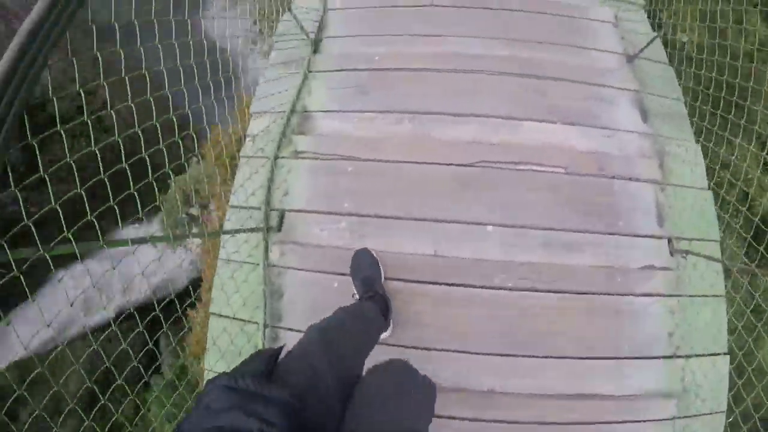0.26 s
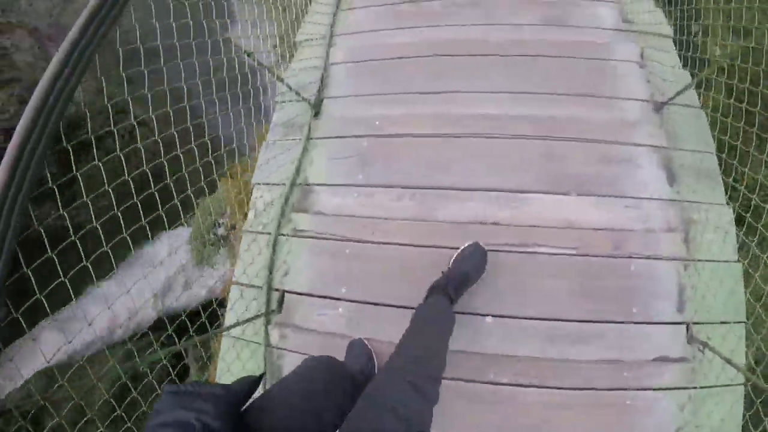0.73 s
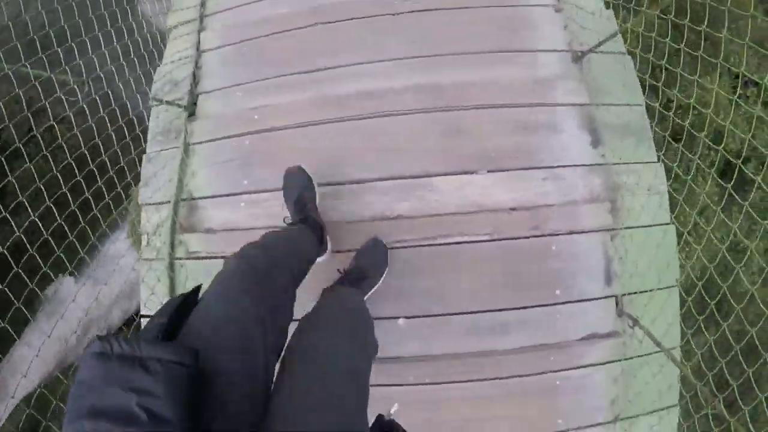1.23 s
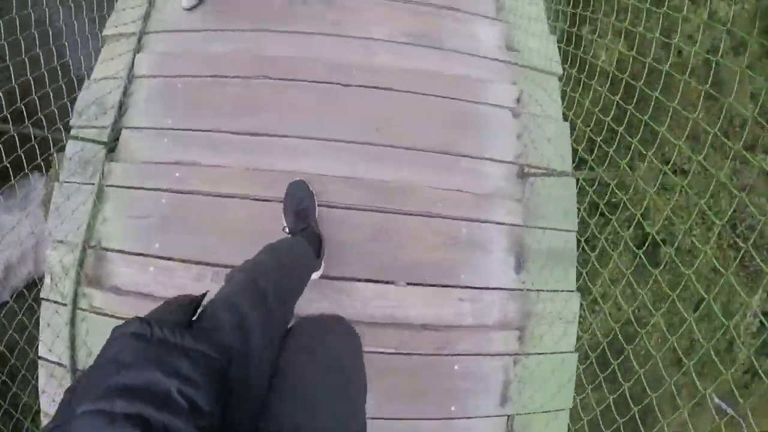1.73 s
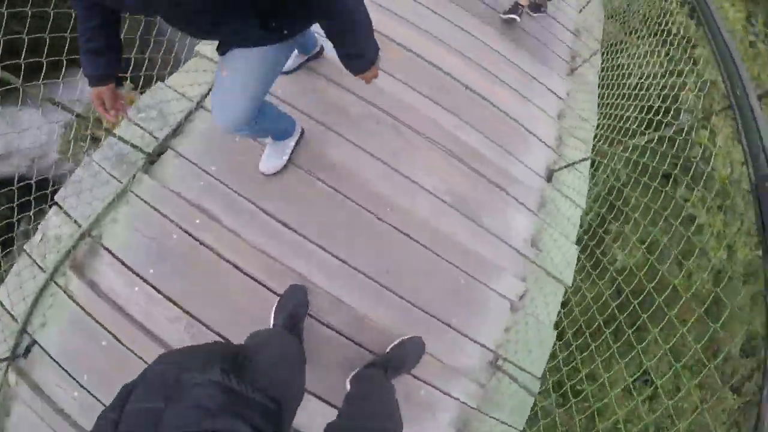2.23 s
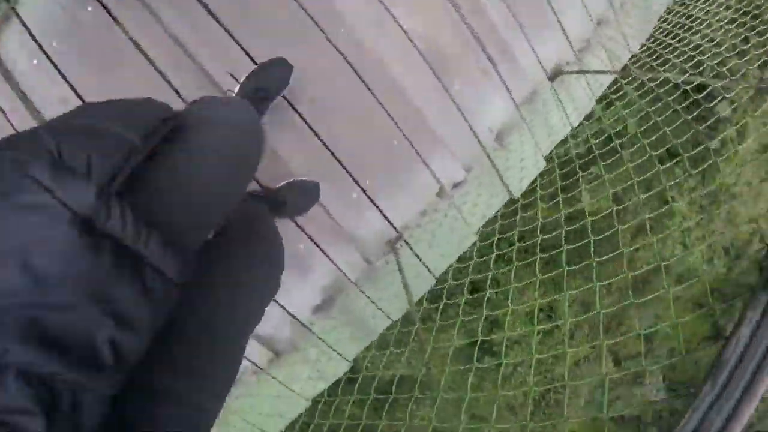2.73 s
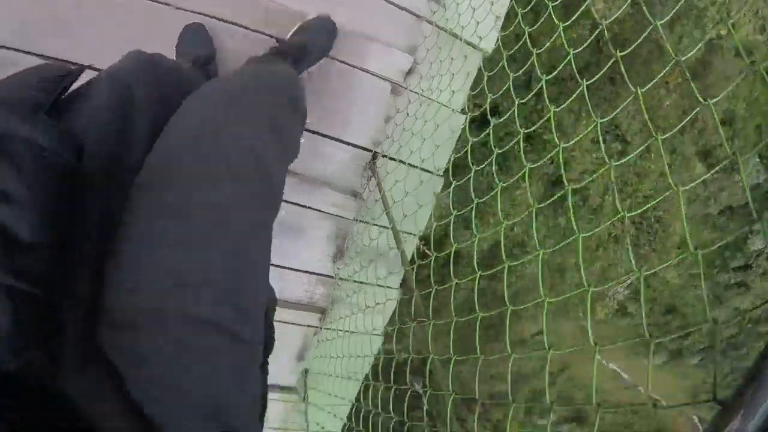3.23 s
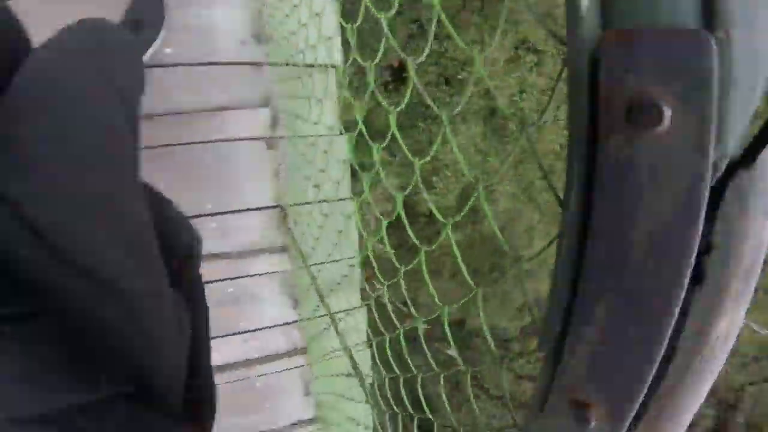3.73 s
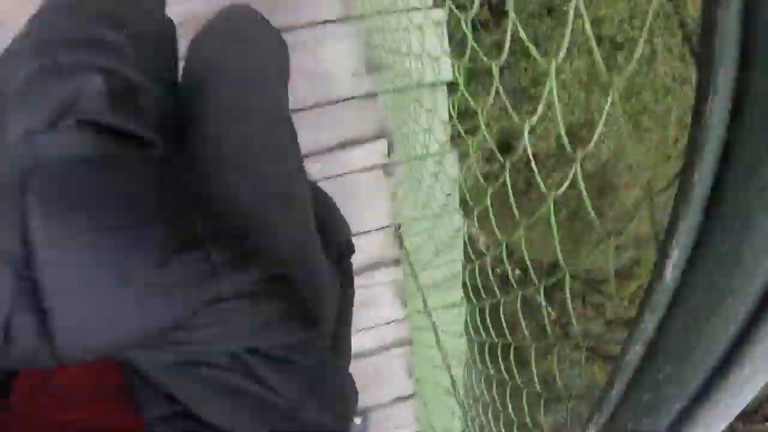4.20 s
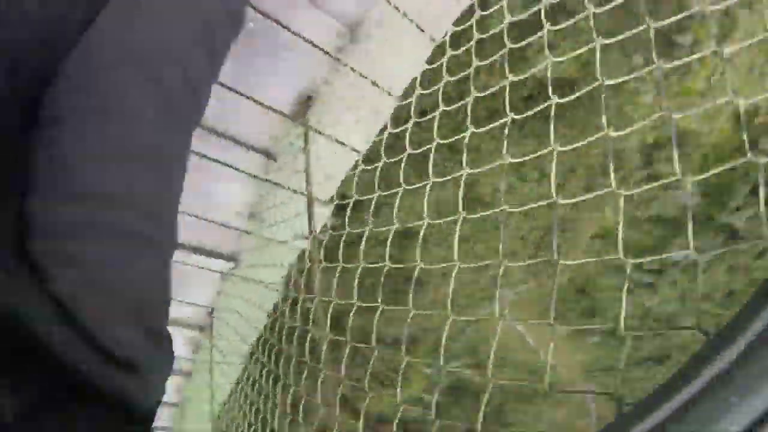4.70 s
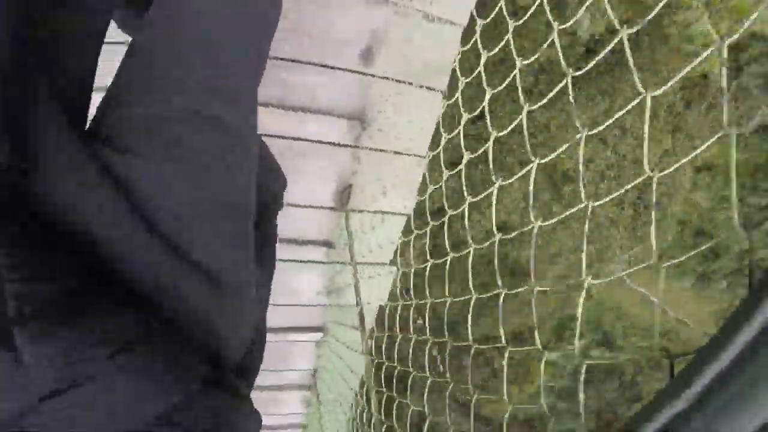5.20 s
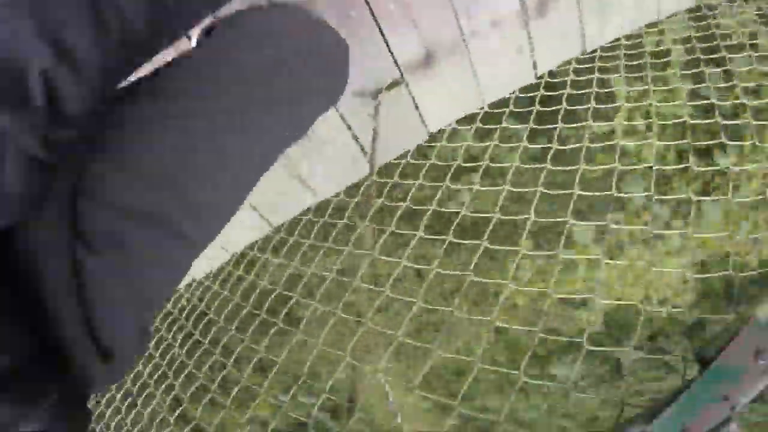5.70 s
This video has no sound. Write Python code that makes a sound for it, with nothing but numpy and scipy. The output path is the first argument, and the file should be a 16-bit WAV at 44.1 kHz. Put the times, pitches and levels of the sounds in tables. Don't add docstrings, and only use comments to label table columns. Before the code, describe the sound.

Muffled rushing water hisses steadily below a plank bridge while heavy low thumps, plastic knocks and jacket scuffs strike a chest-worn, enclosed camera microphone.

```python
import sys
import numpy as np
from scipy import signal
from scipy.io import wavfile
from scipy.ndimage import uniform_filter1d

SR = 44100
rng = np.random.default_rng(int(sys.argv[2]) if len(sys.argv) > 2 else 0)


def invert_db(level):
    return 10 ** (np.asarray(level, dtype=float) / 20)


def put_to_file(sound):
    columns = np.atleast_2d(sound).T
    safe = np.clip(columns, -1, 1)
    whole_steps = np.round(safe * 32767)
    wavfile.write(sys.argv[1], SR, whole_steps.astype(np.int16))


N = 262395


def evened(x):
    return x / np.sqrt(np.mean(x ** 2) + 1e-20)


def add(mix, s, sound):
    part = mix[round(s * SR):][:len(sound)]
    part += sound[:len(part)]


def along(rows):
    s, *columns = np.transpose(rows)
    return [np.interp(np.arange(N) / SR, s, c) for c in columns]


def bandpass(x, order, lo_hz, hi_hz):
    sos = signal.butter(order, [lo_hz, hi_hz], "band", fs=SR, output="sos")
    return signal.sosfilt(sos, x)


def band(x, lo_hz, hi_hz):
    return evened(bandpass(x, 2, lo_hz, hi_hz))


# time in seconds, level in dB.
TORRENT_LEVEL = [(0.0, -48), (2.0, -51), (3.0, -49.5), (4.6, -50), (5.95, -49)]
# frequency in Hz, density in dB per Hz.
WATER_COLOUR = [(53, -57), (90, -11), (145, 8), (315, -19), (380, -6), (859, -6.5), (1220, -9), (2060, -7),
                (2240, -10), (3630, -7.5), (5170, -13.5), (6110, -8.5), (7230, -18), (13200, -30)]
# frequency in Hz, width in Hz, lift in dB.
HOUSING_MODES = [(1247, 212, 7.5), (2268, 167, 10.5), (3150, 600, 2), (3767, 65, 8.5), (6075, 360, 6.5)]


def torrent():
    frames, hz = N // 256 + 5, np.fft.rfftfreq(1024, 1 / SR)
    real, imaginary, patches = rng.standard_normal((frames, 513, 3)).T
    patches = uniform_filter1d(patches, 10, 0)
    patches = evened(uniform_filter1d(patches, 10, 1))

    colour_hz, density_db = np.transpose(WATER_COLOUR)
    colour_db = np.interp(np.log(hz + 1), np.log(colour_hz), density_db)
    for mode_hz, width_hz, lift_db in HOUSING_MODES:
        colour_db += lift_db / (1 + (2 * (hz - mode_hz) / width_hz) ** 2)
    colour_db -= 6.3 / (1 + np.exp((3900 - hz) / 40))

    spectra = (real + 1j * imaginary) * invert_db(colour_db[:, None] + 1.2 * patches)
    hiss = signal.istft(spectra, nperseg=1024, noverlap=768)[1][:N]
    scale = np.std(bandpass(hiss, 4, 1000, 6800))
    return hiss / scale * invert_db(along(TORRENT_LEVEL)[0] + ducking())


# time in seconds, effort in dB over standing still.
EFFORT = [(0.0, 2), (1.5, 0.5), (1.75, 5), (2.0, 1), (2.3, 13.5), (2.4, 0), (2.5, 7), (2.9, 12), (3.1, 4),
          (3.6, 1), (3.9, 13), (4.1, 5), (4.4, 8.5), (4.85, 11.5), (5.05, -3.5), (5.62, 17.5), (5.76, -2),
          (5.95, 14)]


def shaking():
    effort_db = along(EFFORT)[0]
    sway_db = -40 + 0.46 * effort_db
    deck_db = -50.5 + 1.3 * effort_db
    rustle_db = -54.5 + 0.33 * effort_db

    a, b, c, lumps = rng.standard_normal((N, 4)).T
    lumps = evened(uniform_filter1d(uniform_filter1d(lumps, 700), 700))
    sway = invert_db(sway_db + 0.5 * lumps) * band(a, 7.8, 29.0)
    deck = invert_db(deck_db + 2.5 * lumps) * band(b, 51.3, 79.6)
    rustle = invert_db(rustle_db + 0.25 * ducking() + 2.1 * lumps) * band(c, 68, 334)
    return sway + deck + rustle


# time in seconds, pitch in Hz, level in dB.
WHISTLES = [
    [(1.33, 1118, -72), (1.38, 1170, -57), (1.45, 1276, -53), (1.52, 1330, -69)],
    [(5.06, 3450, -78), (5.09, 3510, -55), (5.12, 3530, -58), (5.145, 3750, -75)],
]


def whistles():
    out = np.zeros(N)
    for rows in WHISTLES:
        s, hz, db = np.transpose(rows)
        t = np.arange(s[0], s[-1], 1 / SR)
        phase = 2 * np.pi * np.cumsum(np.interp(t, s, hz)) / SR
        add(out, s[0], invert_db(np.interp(t, s, db)) * np.sin(phase))
    return out


# start in seconds, peak in dB, first swing in Hz, last swing in Hz, decay t60 in seconds.
PUSHES = [(2.122, -17.5, 60, 65, 0.2), (2.205, -20.5, 65, 68, 0.22), (2.479, -17.5, 55, 61, 0.41),
          (2.515, -7.5, 45, 51, 0.11), (2.846, -21.5, 60, 55, 0.19), (3.356, -13, 25, 13.6, .15),
          (3.378, -13.5, 85, 50, 0.14), (4.239, -6, 35, 19.2, 0.3), (4.578, -10, 60, 41, 0.081),
          (4.938, 7.5, 46, 42.2, 0.1), (5.245, -21.5, 48, 47, 0.13), (5.46, -7, 40, 27.5, 0.15),
          (5.509, -7.5, 65, 35.6, 0.35), (5.56, -31, 60, 53, 0.11), (5.6, -24, 30, 13, 0.13),
          (5.647, -1, 48, 24.5, 0.23), (5.879, -26.5, 52, 47, 0.57)]
PULLS = [(1.698, -31, 45, 30, 0.73), (2.344, 5, 128, 22.2, 0.16), (2.767, -5, 43, 24.2, 0.34),
         (3.109, -15, 22.2, 21.3, 0.28), (3.798, -10, 74, 40, 0.06), (3.992, -4.5, 65, 43.8, .15),
         (4.214, -10, 48, 42.2, 0.09), (4.297, -17, 52, 40, .082), (4.947, -4, 40, 23.3, 0.13),
         (5.657, 2, 70, 15, .15)]
HEAVES = [
    (2.391, -37, 30, 24, 0.096),
    (4.363, 7.5, 52, 28.3, .17),
]


def jolts():
    out, t = np.zeros(N), np.arange(SR // 2) / SR
    sharp, slow = 0.177, 0.56
    for direction, turns, rows in ((1, sharp, PUSHES), (-0.91, sharp, PULLS), (-0.91, slow, HEAVES)):
        for s, db, first_hz, last_hz, t60 in rows:
            hz = last_hz + (first_hz - last_hz) * np.exp(-t / 0.0047)
            rise = (1 - np.exp(-t * first_hz / turns)) ** 2
            swing = np.sin(2 * np.pi * np.cumsum(hz) / SR)
            add(out, s, direction * invert_db(db - 60 * t / t60) * rise * swing)
    return out


def resonate(x, hz, width):
    r = np.exp(-np.pi * width / SR)
    return signal.lfilter([1 - r, 0, r - 1], [1, -2 * r * np.cos(2 * np.pi * hz / SR), r * r], x)


def ring(drive, part):
    modes, lo_hz, hi_hz = part
    out = sum(invert_db(db) * resonate(drive, hz, width) for hz, width, db in modes)
    out = bandpass(out, 3, lo_hz, hi_hz)
    return out / abs(out).max()


# start in seconds, peak in dB, decay t60 in seconds, chest plate in dB.
TUGS = [(2.111, -35.5, .14, -21), (2.206, -25, .1, -15), (2.749, -32, 0.037, -28), (3.38, -27, .033, -26),
        (3.799, -29.5, 0.16, -24), (3.987, -40, .1, 5), (4.214, -38.5, .1, 0.5), (4.292, -36, 0.13, -2.5),
        (4.817, -36, 0.084, -20), (4.933, -19.5, 0.061, 2.5), (5.511, -42, .1, 7), (5.876, -34, 0.045, -1)]
# start in seconds, peak in dB, decay t60 in seconds,
# slack in dB that reaches strap and plate.
KNOCKS = [(2.245, -33.5, .071, -7), (2.297, -35.5, 0.34, 0), (2.35, -19.5, 0.039, -28),
          (2.477, -35.5, .22, -5), (2.497, -31, 0.24, -14), (2.51, -26.5, 0.072, -10),
          (2.648, -44.5, 0.38, -15.5), (2.841, -36.5, 0.37, -9), (3.062, -42, 0.086, -9),
          (3.213, -37, .075, -18), (3.228, -37, 0.26, -12), (3.322, -43, 0.13, -14),
          (3.355, -31.5, 0.31, -13), (3.697, -37, .081, -11), (3.768, -30, 0.26, -1),
          (3.887, -38.5, .07, -7), (3.968, -32, 0.31, -3), (4.316, -32.5, 0.15, -1),
          (4.341, -24, .068, -31), (4.386, -27.5, 0.038, -6.5), (4.499, -30, 0.16, -9),
          (4.513, -49, .1, -14), (4.945, -25, 0.085, -2.5), (5.365, -33.5, 0.067, -16),
          (5.423, -37.5, .1, -7), (5.427, -35, 0.72, -25), (5.471, -36, .14, 2.5),
          (5.615, -25.5, 0.14, -4.5), (5.658, -26.5, 0.13, -5), (5.941, -31.5, 0.072, -21)]
# modes as frequency in Hz, width in Hz, level in dB; then lowest and highest Hz passed.
MOUNT = [(444, 26, 0), (385, 90, -7.5)], 220, 475


def knocks():
    strap = [(305, 123, 0)], 180, 420
    plate = [(172, 82, 0)], 141, 290
    plate_under_strap_db, mount_in_tug_db = -5, -8.5

    out, t = np.zeros(N), np.arange(SR // 5) / SR
    rows = [(s, db, t60, 0, slack, slack + plate_under_strap_db) for s, db, t60, slack in KNOCKS]
    rows += [(s, db, t60, mount_in_tug_db, 0, plate_db) for s, db, t60, plate_db in TUGS]
    for (s, db, t60, *parts_db), noise in zip(rows, rng.standard_normal((len(rows), len(t)))):
        drive = noise * invert_db(-60 * t / t60) + 35 * (t == 0)
        parts = zip(parts_db, (MOUNT, strap, plate))
        add(out, s, invert_db(db) * sum(invert_db(part_db) * ring(drive, part) for part_db, part in parts))
    return out


# start in seconds, peak in dB, decay t60 in seconds, bass in dB, crack in dB.
SCUFFS = [(2.2074, -25.5, 0.02, -2.5, -24), (2.245, -36.5, 0.04, -6, -21), (2.284, -40, .033, -7, -15),
          (2.2952, -35.5, 0.071, -2.5, -18), (2.3486, -17.5, 0.019, -5.5, -10),
          (2.4782, -43.5, 0.058, 5, -19), (2.4964, -39, 0.04, -5, -9), (2.5122, -29.5, 0.053, -4.5, -15),
          (2.9, -40, 0.29, -11, -13), (3.258, -39, .034, -6, -15), (3.7689, -40, .032, 2, -14),
          (3.7996, -30.5, 0.027, -2, -22), (3.9649, -43, 0.025, 4, -16), (4.3393, -41.5, 0.036, 6, -23),
          (4.5012, -37, 0.028, -1, -20), (4.8205, -35.5, .037, -6, -22), (4.827, -30, 0.017, -11, -22),
          (4.9345, -25, 0.043, 1, -21), (4.9399, -28.5, 0.033, -11, -21), (4.962, -37.5, 0.17, -9, -24),
          (5.3644, -46, 0.022, 5, -18), (5.5205, -49, .03, 13, -24), (5.6575, -32.5, .046, -3.5, -18),
          (5.7169, -38, .03, -6, -19)]
# start in seconds, peak in dB, decay t60 in seconds,
# treble in dB, crack in dB.
TICKS = [(2.3704, -47, .03, -13, -24), (2.5059, -34.5, 0.02, 0.5, -30), (2.749, -34, 0.055, -8, -22),
         (2.8413, -32.5, 0.042, -11, -16), (3.347, -16.5, 0.031, -5, -36), (3.3503, -17.5, 0.041, -31, -39),
         (3.3673, -25.5, .035, -4, -24), (3.3739, -26, .032, -2, -27), (3.3964, -34, 0.026, -17, -14),
         (3.9888, -43, .03, -9, -20), (4.3195, -27.5, 0.0094, -3, -15), (4.3725, -34, 0.034, -17, -22),
         (4.3866, -36, 0.04, -15, -21), (5.4242, -29, 0.053, -8, -19), (5.6114, -37, 0.035, -8, -25),
         (5.9414, -33, 0.021, -3, -18)]
# modes as frequency in Hz, width in Hz, level in dB; then lowest and highest Hz passed.
SHELL = [(1477, 270, -1), (1607, 47, -1), (2228, 440, 2)], 1200, 2470
SHELL_TREBLE = [(3410, 320, 1), (3686, 120, 5.5)], 2730, 3860
SHELL_BASS = [(798, 166, 2), (1210, 87, 8.5)], 690, 1218
SHELL_CRACK = [(4760, 440, 13), (5270, 620, -2), (6200, 880, -15), (8800, 2500, -15)], 4000, 10500


def scuffs():
    tick_bass_db, scuff_treble_db = -18.5, -8.5
    out, t = np.zeros(N), np.arange(SR // 8) / SR
    rows = [(s, db, t60, treble, tick_bass_db, crack) for s, db, t60, treble, crack in TICKS]
    rows += [(s, db, t60, scuff_treble_db, bass, crack) for s, db, t60, bass, crack in SCUFFS]
    noises = rng.standard_normal((len(rows), 2, len(t)))
    for (s, db, t60, *colour_db), (noise, grain) in zip(rows, noises):
        drive = noise * invert_db(3 * grain - 60 * t / t60) + 5 * (t == 0)
        parts = zip(colour_db, (SHELL_TREBLE, SHELL_BASS, SHELL_CRACK))
        walls = ring(drive, SHELL) + sum(invert_db(part_db) * ring(drive, part) for part_db, part in parts)
        rise_s = 0.0011 * invert_db(-30.5 - db)
        add(out, s, invert_db(db) * np.minimum(t / rise_s, 1) * walls)
    return out


# time in seconds, depth in dB.
DUCKS = [(2.352, 6.5), (2.52, 2.5), (3.36, 3.5), (3.62, 3.5), (3.8, 3), (4.0, 3.5), (4.25, 2), (4.945, 6)]


def ducking():
    hold_s, recover_db_per_s = 0.062, 10
    t = np.arange(N) / SR
    dips = [(t >= s) * (db - recover_db_per_s * np.maximum(t - s - hold_s, 0)) for s, db in DUCKS]
    deepest = np.maximum(np.max(dips, axis=0), 0)
    return -uniform_filter1d(deepest, size=300)


def scene():
    return (torrent() + shaking() + whistles() + jolts() + knocks() + scuffs())[None]


def thinned(x):
    padded = np.pad(x, ((0, 0), (0, 4096)), "reflect")
    hz, _, z = signal.stft(padded, SR, nperseg=1536)
    bar_db = np.interp(hz, [6600, 8000, 10000, 13000], [-25, -1, 2, 5])
    usual = uniform_filter1d(np.median(abs(z), axis=-1), size=15)[..., None]
    lately = uniform_filter1d(np.minimum(abs(z), 2 * usual), size=21, axis=1)
    lately = uniform_filter1d(lately, size=15)
    bar = invert_db(bar_db)[:, None] * np.sqrt(usual * lately)
    return signal.istft(z * (abs(z) > bar), SR, nperseg=1536)[1][:, :N]


def band_limit(x):
    return signal.sosfilt(signal.butter(12, 16500, fs=SR, output="sos"), x)


def record(dry):
    mix = thinned(np.clip(dry, -1, 1))
    return band_limit(mix)


dry = scene()
out = record(dry)
put_to_file(out)
```